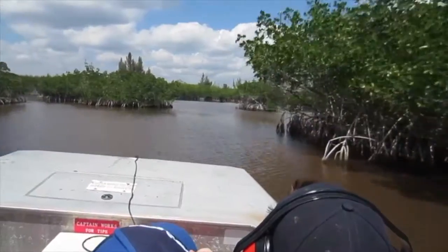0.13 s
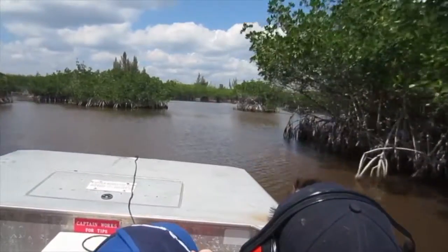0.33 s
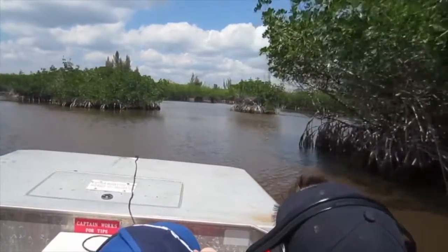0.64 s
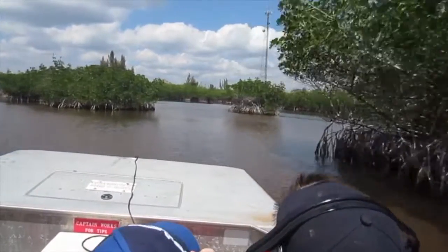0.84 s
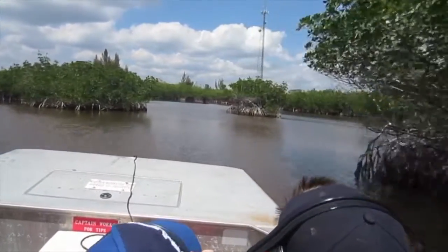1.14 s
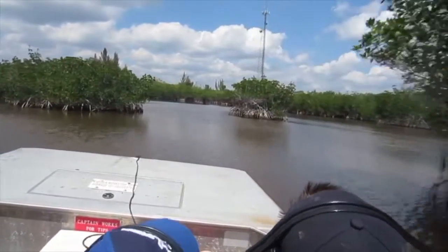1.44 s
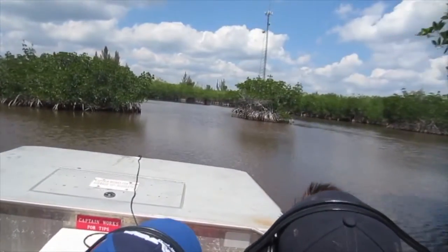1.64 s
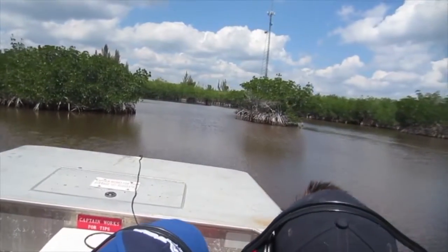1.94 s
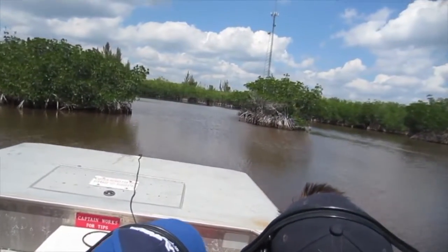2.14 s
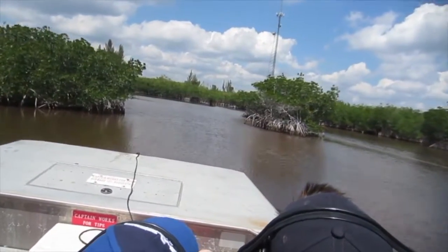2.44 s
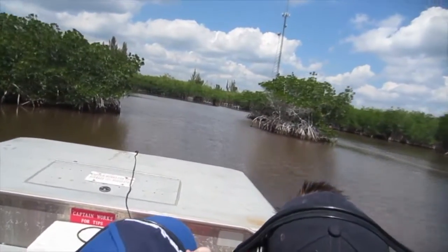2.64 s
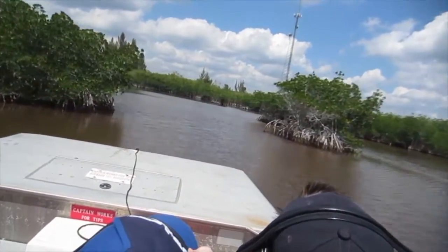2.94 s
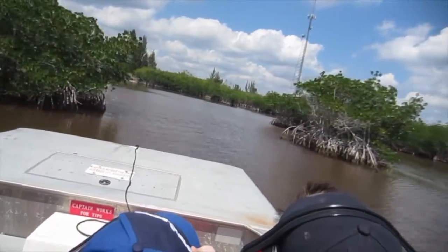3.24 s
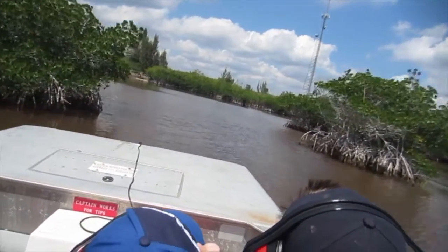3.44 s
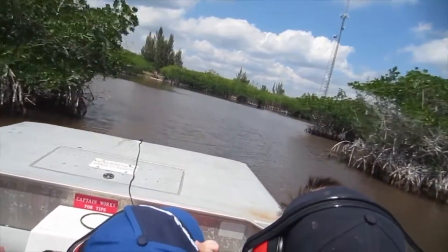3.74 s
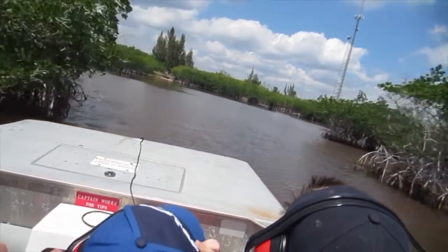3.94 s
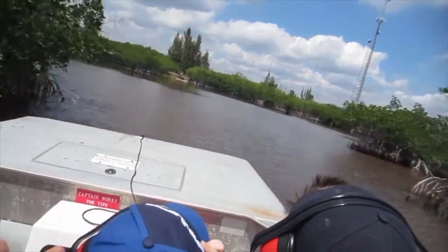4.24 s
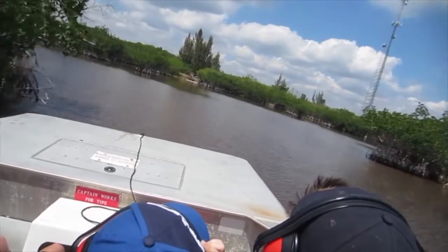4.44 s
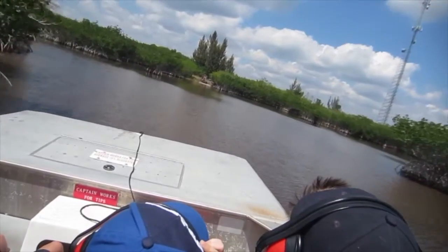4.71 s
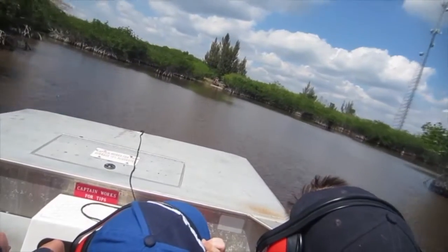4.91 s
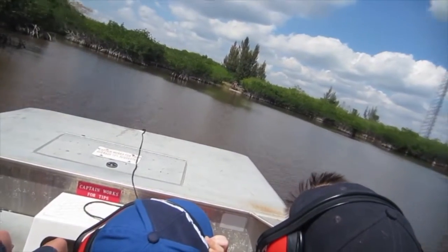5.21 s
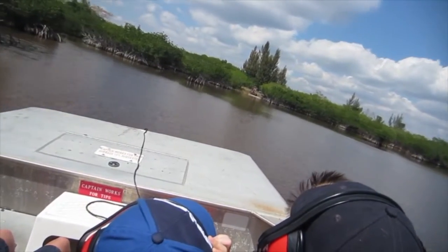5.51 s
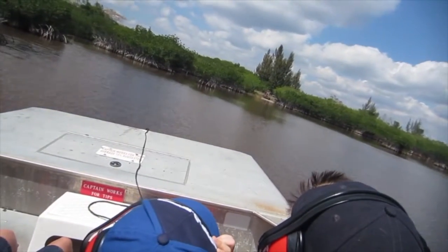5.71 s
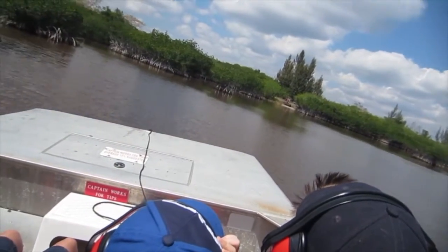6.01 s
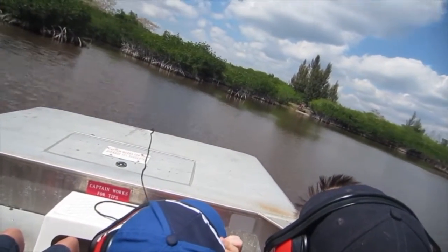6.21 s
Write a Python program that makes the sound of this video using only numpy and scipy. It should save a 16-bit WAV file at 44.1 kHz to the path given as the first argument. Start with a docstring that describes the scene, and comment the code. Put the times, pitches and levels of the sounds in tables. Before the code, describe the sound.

A loud airboat engine and propeller drone steadily across calm water, creeping up in pitch, with early wind buffeting the microphone mostly on the right.

```python
"""The engine and propeller of an airboat on calm water, heard from a seat in front of the engine.
Exhaust beat and geared propeller drone are two stacks of sine tones that follow the engine speed.
Shaped noise makes the rest: the roar of the slipstream, wind buffeting the microphone (mostly its
right port), and a faint hiss on top. The overdriven input softly squeezes all of it."""
import sys
import numpy as np
from scipy import signal
from scipy.io import wavfile
from scipy.ndimage import uniform_filter1d

SR = 44100
rng = np.random.default_rng(int(sys.argv[2]) if len(sys.argv) > 2 else 0)


def persist_wave(psi):
    """Save psi, clipped to +-1, as 16-bit WAV."""
    counts = np.round(np.clip(psi, -1, 1) * 32767).astype(np.int16)
    wavfile.write(sys.argv[1], SR, np.atleast_2d(counts).T)


N = 280476  # length in samples

# how fast the engine turns over time: time_s, engine_cycles_hz
ENGINE_SPEED = [(0, 28.28), (0.8, 28.34), (1.2, 28.62), (1.65, 29.27), (1.95, 29.5), (2.25, 29.66),
                (2.55, 29.17), (2.85, 29.0), (3.15, 29.17), (3.5, 29.22), (4.05, 30.23), (4.95, 31.65),
                (5.25, 31.77), (5.85, 32.47), (6.36, 32.72)]
CRUISE_HZ = 30.5  # engine cycles per second at which the tone and roar levels are stated


def gain_of(db):
    """Turns decibels into a plain factor."""
    return 10 ** (np.asarray(db) / 20)


def evened(x):
    """Scales a signal to an rms of 1."""
    return x / np.sqrt(np.mean(x ** 2) + 1e-20)


def read(points, hz):
    """Reads a spectrum, straight lines on a log-frequency axis."""
    point_hz, value = np.transpose(points)
    return np.interp(np.log(hz + 1), np.log(point_hz + 1), value)


def curve(rows, t):
    """Reads a time curve, straight lines between its points."""
    return np.interp(t, *np.transpose(rows))


def drift(top_hz, count):
    """Slow chance: rows of smoothed noise, made at rms 1 on a coarse grid, then filled in."""
    step = 256  # samples between grid points
    slow = rng.standard_normal((count, N // step + 2))
    cutoff = min(top_hz * 2 * step / SR, .9)
    slow = signal.filtfilt(*signal.butter(1, cutoff), slow)
    return [np.interp(np.arange(N) / step, np.arange(len(row)), evened(row)) for row in slow]


def tones(orders, turns, speed, start, level_db, waver_db, waver_rad, waver_hz):
    """A stack of multiples of one rotation; each wavers in level and phase in the turbulent air."""
    # echoes off hull and water cancel tones that pass these places: centre_hz, half_width_hz, depth_db
    nulls = [(86.4, 2.2, -5), (240.5, 8, -7.5), (341.4, 15, -8)]
    level_drifts, phase_drifts = drift(waver_hz, len(orders)), drift(waver_hz, len(orders))
    out = np.zeros((2, N))
    over = speed - CRUISE_HZ
    rate_hz = np.gradient(turns[1]) * SR
    for order, sway, slip, start_rad in zip(orders, level_drifts, phase_drifts, start):
        k, db, db_per_hz, bend_db = order
        loose = k ** 0.96  # higher tones are shaken more
        null_db = sum(depth_db * np.exp(-((k * rate_hz - hz) / width) ** 2)
                      for hz, width, depth_db in nulls)
        steady_db = db + db_per_hz * over + bend_db * over ** 2 + null_db + level_db
        sway_db = waver_db * loose * np.minimum(sway, .8)  # tones dip more than they swell
        level = np.sqrt(2) * gain_of(steady_db + sway_db)  # sine peak from rms
        angle = 2 * np.pi * k * turns + start_rad + waver_rad * loose * slip
        out += level * np.sin(angle)
    return out


def noise(shape_db, same, patchy_db, flicker_db, size):
    """Stereo noise at rms 1 from random short-time spectra, shaped by shape_db(hz, t) and same(hz)."""
    hop = size // 4
    frames, hz = N // hop + 5, np.fft.rfftfreq(size, 1 / SR)[:, None]
    a, b, c, d, patches = rng.standard_normal((frames, len(hz), 5)).T
    # patches: lumps in time and pitch; flicker: all pitches together
    patches = uniform_filter1d(patches, size=10, axis=0)
    patches = evened(uniform_filter1d(patches, size=10, axis=1))
    flicker = evened(uniform_filter1d(rng.standard_normal(frames), size=3))
    # the right channel is part copy of the left, part noise of its own
    likeness = np.clip(same(hz), -1, 1)
    left, own = a + 1j * b, c + 1j * d
    spectra = np.array([left, likeness * left + np.sqrt(1 - likeness ** 2) * own])
    frame_s = np.arange(frames) * hop / SR
    spectra *= gain_of(shape_db(hz, frame_s) + patchy_db * patches + flicker_db * flicker)
    sound = signal.istft(spectra, nperseg=size, noverlap=size - hop)[1]
    return evened(sound[:, :N])


def engine(cycles, speed):
    """Uneven firing through two pipes gives many multiples of the engine cycle."""
    # exhaust tones: cycle_multiple, cruise_rms_db, gain_db_per_hz above cruise, bend_db_per_hz_squared
    exhaust = [(2, -25.5, 1, -0.08), (3, -25, 0.54, 0.3), (4, -28, 3, -0.5), (5, -15.5, 0.97, -0.44),
               (6, -31, 2.8, -1.4), (7, -27, -1.66, -0.33), (8, -31, 0.6, 0.3), (9, -37.5, -3.5, -0.56),
               (10, -36.5, 3, 0.5), (11, -24.5, -0.32, .5), (12, -33, -3, -0.1), (14, -42.5, 0, 0.3),
               (15, -46.5, -1, 2.4), (16, -28.5, -1.6, -2.6), (17, -45, -2.5, 1), (19, -41.5, -1.1, 0.9),
               (20, -47, -1.5, -.9)]
    ringing = np.array([row[0] == 5 for row in exhaust])  # the fifth runs against its neighbours
    start = 2.3 * ringing + 0.31 * rng.standard_normal(len(exhaust))
    return tones(exhaust, cycles, speed, start, 0, waver_db=0.1546, waver_rad=0.031, waver_hz=3.8)


def propeller(passes, speed, t):
    """Each blade pass is a pressure pulse, smeared by cage and hull: its tones are loosely in step."""
    # blade tones, levels before the curve below:
    # blade_multiple, cruise_rms_db, gain_db_per_hz of engine speed above cruise, bend_db_per_hz_squared
    blades = [(1, -24, 1.1, -0.5), (2, -28.5, 1, -2), (3, -22.5, .1, -0.57), (4, -22, -0.44, -.5),
              (5, -27.5, -0.4, 0.3), (6, -30, 3.5, -1.05), (7, -31, 1.3, -.9), (8, -32, 1.8, -0.23),
              (9, -32, 1.9, -0.13), (10, -35, -0.9, -0.22), (11, -46.5, -0.8, .9), (12, -47.5, 4, -0.4)]
    # level change shared by all blade tones: time_s, level_db
    blade_level = [(0, 0.7), (.6, 0.1), (1.3, 2), (2.1, -1.5), (2.9, 1), (4.3, -0.25), (5.3, -0.4),
                   (5.8, -6), (6.36, -1.8)]
    start = 1.4 * rng.standard_normal(len(blades))
    level_db = curve(blade_level, t)
    return tones(blades, passes, speed, start, level_db, waver_db=0.69, waver_rad=0.082, waver_hz=6.5)


def roar(passes, speed):
    """Turbulent slipstream, chopped a little by each blade, louder and brighter with engine speed."""
    # spectrum shape before the tilt: pitch_hz, relative_db_per_hz
    roar_shape = [(25, -28.5), (50, -12), (80, -4.5), (130, -2), (220, 0), (290, -8), (400, -6), (600, -9),
                  (800, -12.5), (1070, -16.5), (1600, -29), (2300, -39.5), (3300, -52.5), (6000, -80)]
    # left-right likeness, 1 is identical: pitch_hz, likeness
    roar_same = [(60, 0.94), (300, 1), (600, 1), (900, 1), (1500, .75), (2600, 0.33)]

    def field(hz, s):
        """Spectrum in dB, tilted toward the treble as the engine speeds up."""
        over = curve(ENGINE_SPEED, s) - CRUISE_HZ
        tilt_db_per_octave = 0.78 + 0.01 * over
        return read(roar_shape, hz) + tilt_db_per_octave * np.log2(hz / 400 + 0.21)

    air = noise(field, lambda hz: read(roar_same, hz), patchy_db=1.2, flicker_db=0.36, size=1024)
    late_left = np.pad(air[0], (3, 0), "edge")[:N]  # three samples later at the left port
    air = np.array([late_left, air[1]])
    level_db = -21 + 0.9 * (speed - CRUISE_HZ)
    chop = 1 + 0.2 * np.cos(2 * np.pi * passes)
    return gain_of(level_db) * air * chop


def wind(t):
    """Lumpy buffeting, almost unrelated at the two ports: a headwind with single gusts."""
    # spectrum shape: pitch_hz, relative_db_per_hz
    wind_shape = [(15, -15), (40, -5.5), (116, 0.5), (250, -4), (400, -1), (720, -6), (900, -17.5),
                  (1500, -23.5), (3000, -50.5), (6000, -81)]
    # steady headwind before the port gains, strong at first, easing as the bow swings round,
    # up again at the end: time_s, level_db
    headwind = [(0, -24), (.45, -22), (.95, -26), (1.05, -33), (2, -32.5), (2.2, -39), (4.2, -39),
                (4.6, -41.5), (5.5, -41), (6.2, -31.5)]
    # single gusts on top, before the port gains: centre_s, peak_db
    gust_list = [(1.39, -22), (1.88, -25), (2.54, -31), (3.02, -30)]
    # gain of each port, left then right: gain_db
    port_gain = [
        [-5],
        [4],
    ]
    gust_s = .035  # half length
    air = noise(lambda hz, s: read(wind_shape, hz) + 0 * s, lambda hz: 0.06 + 0 * hz,
                patchy_db=2.5, flicker_db=-0.5, size=512)
    gusts = sum(gain_of(db) * np.exp(-((t - s) / gust_s) ** 2) for s, db in gust_list)
    return (gain_of(curve(headwind, t)) + gusts) * gain_of(port_gain) * air


def hiss(passes, t):
    """Faint treble hiss, mostly unlike left and right, louder on the right, fluttering with the blades."""
    # spectrum shape with a deep gap near 8 kHz: pitch_hz, relative_db_per_hz
    hiss_shape = [(500, -13.5), (2500, -2), (4500, -0.5), (6000, -6.5), (7200, -16.5), (7900, -26),
                  (8600, -15.5), (9800, -8.5), (12000, -5.5), (14000, -6.5), (15700, -11.5)]
    # left-right likeness, below 0 is opposed: pitch_hz, likeness
    hiss_same = [(2000, -0.27), (4000, -0.3), (8000, -0.053), (14000, -.05)]
    # level before the channel gains: time_s, level_db
    hiss_level = [(0, -61), (1.5, -58), (3.1, -61), (4.9, -59), (6.36, -58.5)]
    air = noise(lambda hz, s: read(hiss_shape, hz) + 0 * s, lambda hz: read(hiss_same, hz),
                patchy_db=0.9, flicker_db=0.75, size=256)
    channel_gain = gain_of([[4.5], [7]])  # dB, left then right
    flutter = 1 + 0.092 * np.cos(2 * np.pi * passes)
    return gain_of(curve(hiss_level, t)) * channel_gain * air * flutter


def scene():
    """One engine rotation drives exhaust, blades and slipstream; wind and hiss are added."""
    t = np.arange(N) / SR
    speed = uniform_filter1d(curve(ENGINE_SPEED, t), size=8000)
    cycles = np.cumsum(speed) / SR
    # pipes and blades sit a little to the right: the left port hears them later
    left = np.array([[1], [0]])
    pipe_lag_s, blade_lag_s = 1.5 / SR, 3.5 / SR
    blades_per_cycle = 2.619  # blade passes per engine cycle, through the gears
    passes = blades_per_cycle * (cycles - speed * blade_lag_s * left)
    cycles = cycles - speed * pipe_lag_s * left
    drive = engine(cycles, speed) + propeller(passes, speed, t)
    return drive + roar(passes, speed) + wind(t) + hiss(passes, t)


def record(dry):
    """The overdriven input squeezes the peaks softly, hiss and all; then the band limit."""
    squeezed = 0.69 * np.tanh(1.15 * dry / 0.77)
    edge_hz = 15750  # top of the band
    band_limit = signal.firwin(511, edge_hz, window=("kaiser", 9), fs=SR)
    return signal.oaconvolve(squeezed, band_limit[None], "same")


dry = scene()
out = record(dry)
persist_wave(out)
```